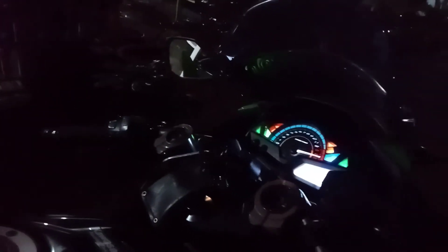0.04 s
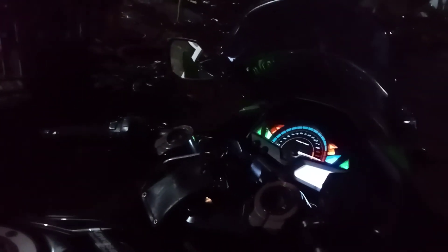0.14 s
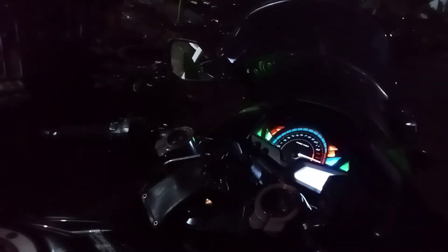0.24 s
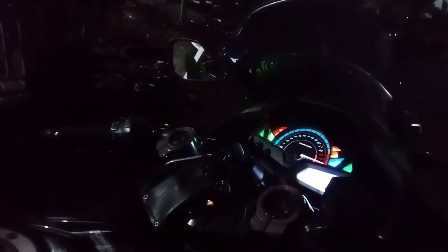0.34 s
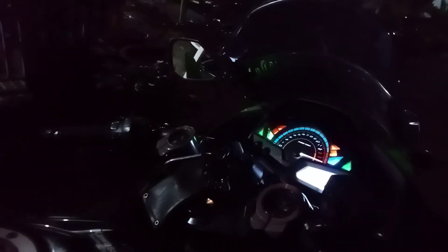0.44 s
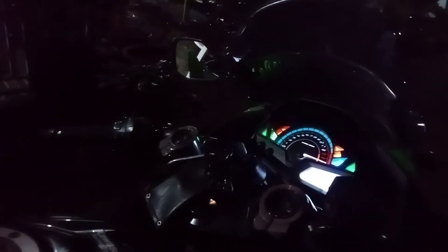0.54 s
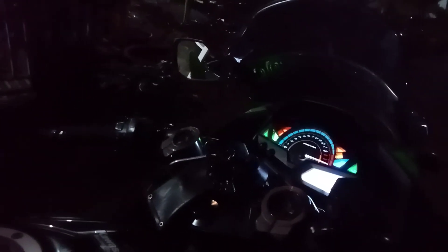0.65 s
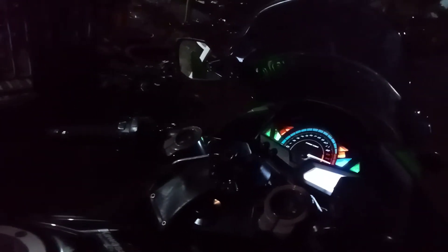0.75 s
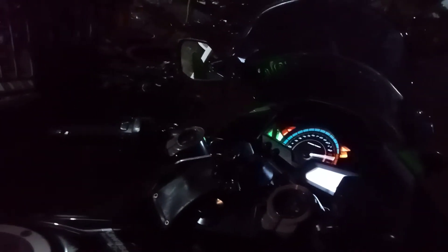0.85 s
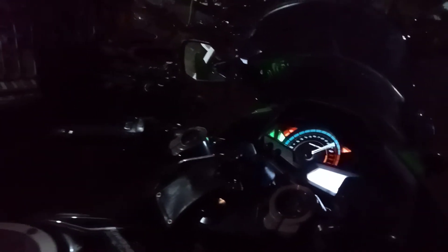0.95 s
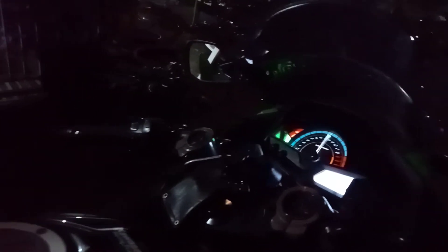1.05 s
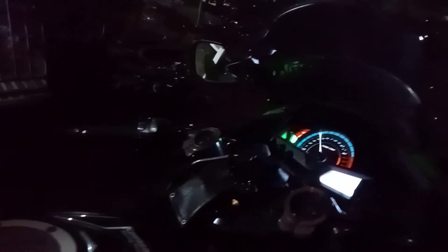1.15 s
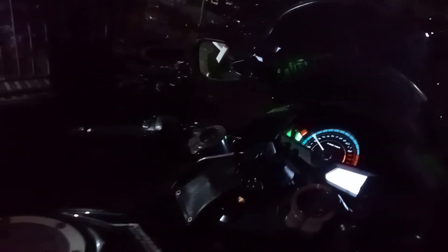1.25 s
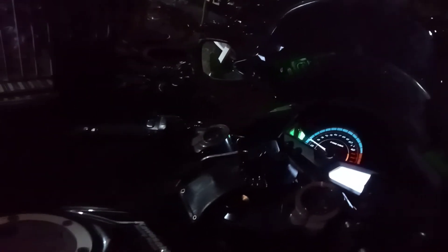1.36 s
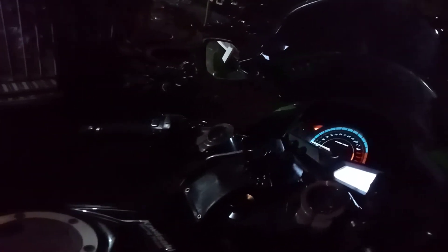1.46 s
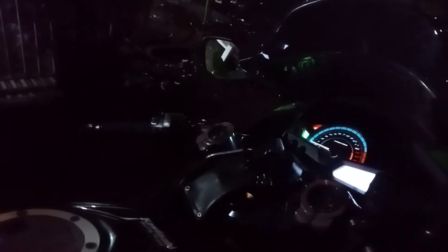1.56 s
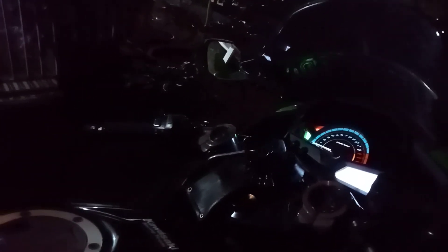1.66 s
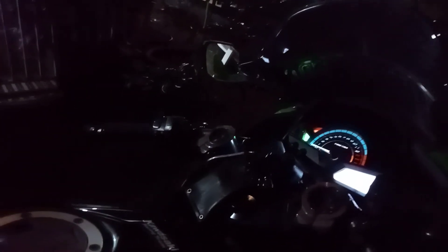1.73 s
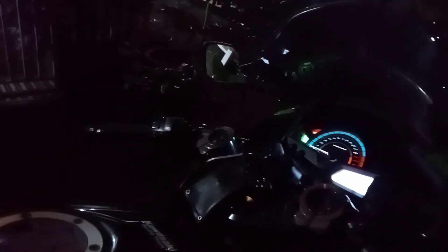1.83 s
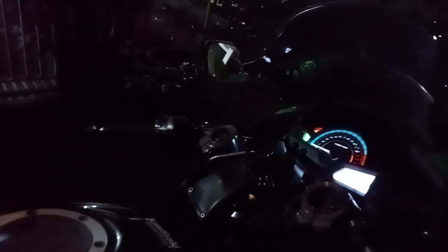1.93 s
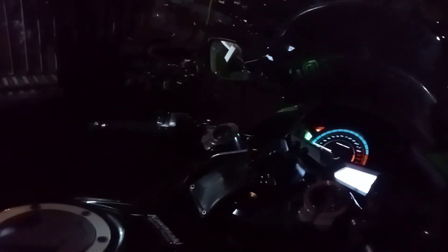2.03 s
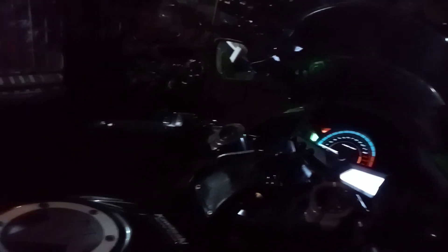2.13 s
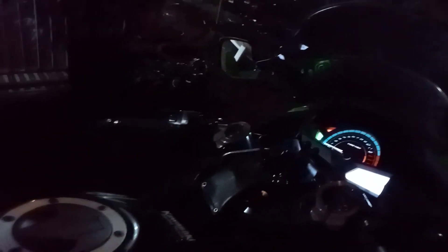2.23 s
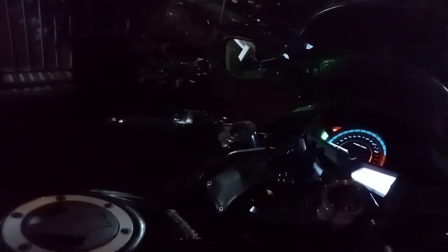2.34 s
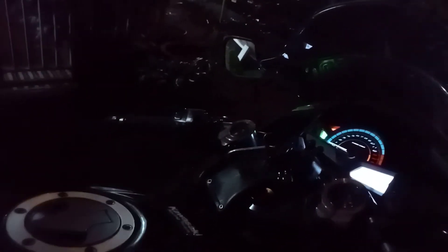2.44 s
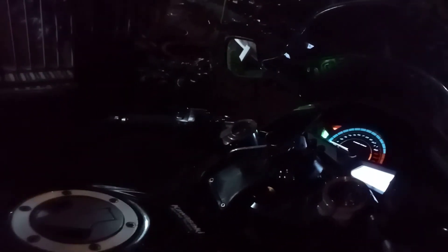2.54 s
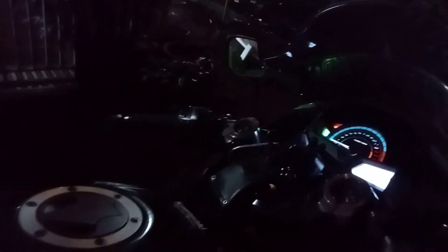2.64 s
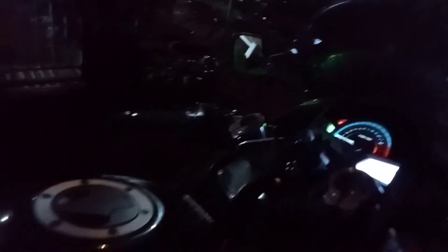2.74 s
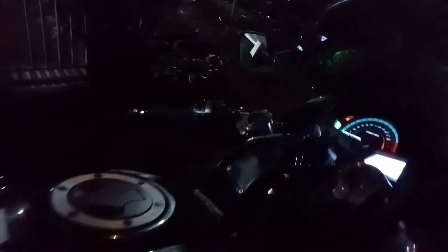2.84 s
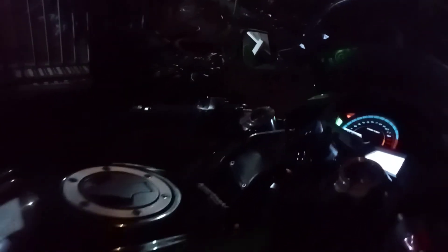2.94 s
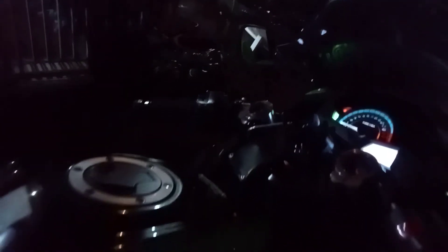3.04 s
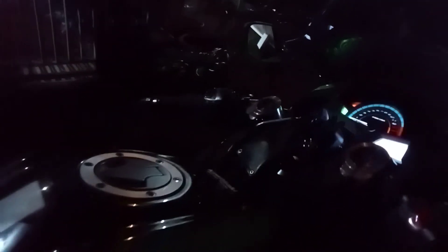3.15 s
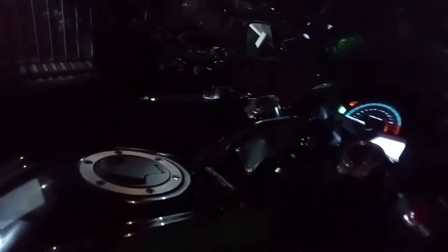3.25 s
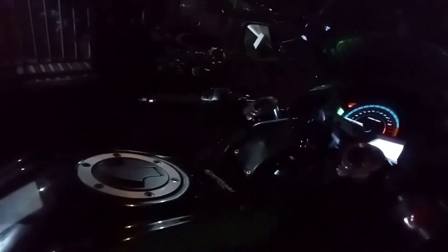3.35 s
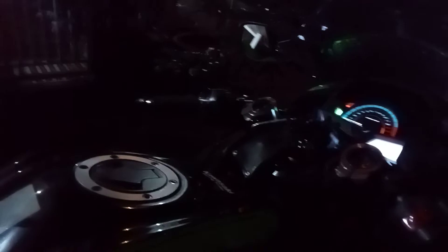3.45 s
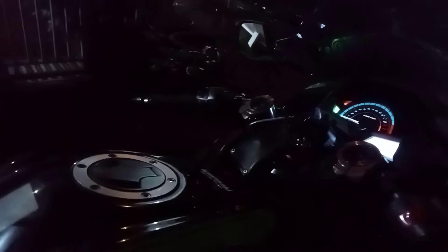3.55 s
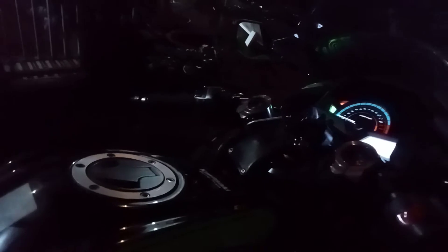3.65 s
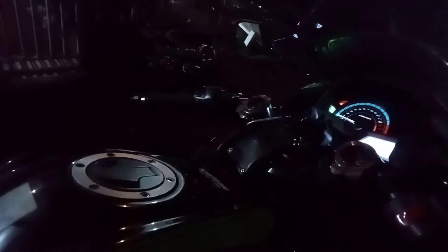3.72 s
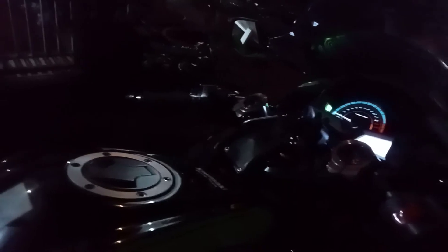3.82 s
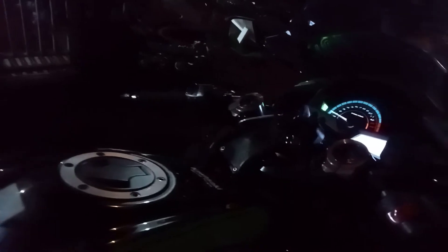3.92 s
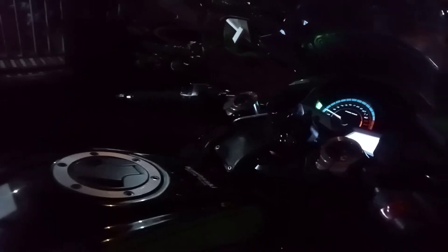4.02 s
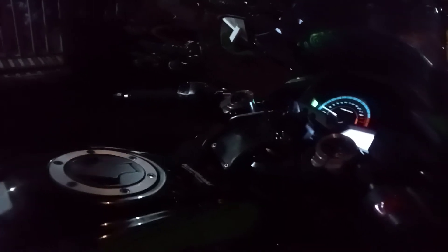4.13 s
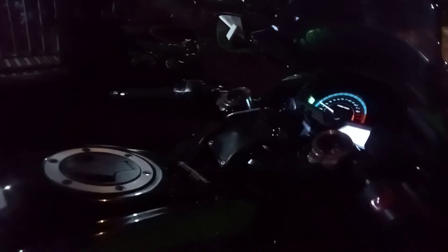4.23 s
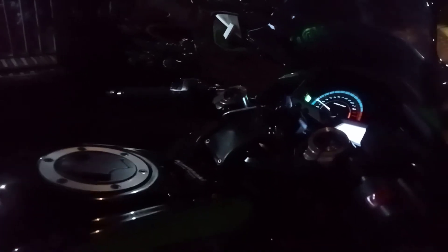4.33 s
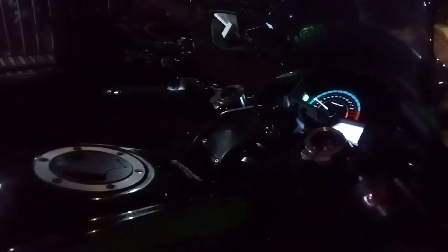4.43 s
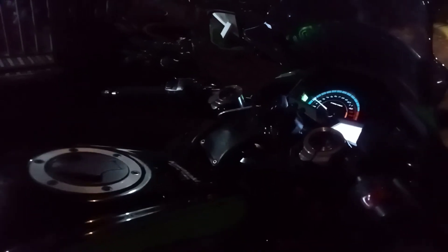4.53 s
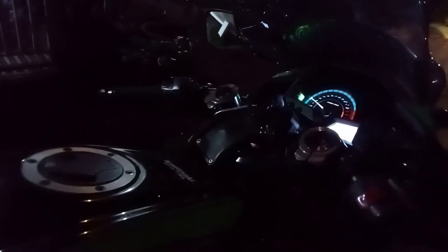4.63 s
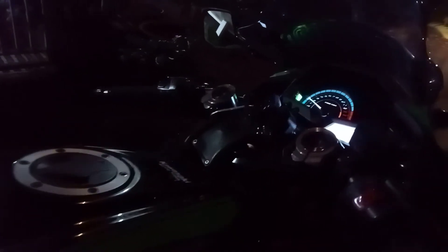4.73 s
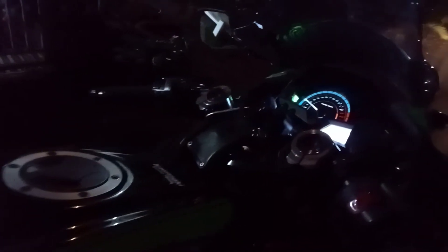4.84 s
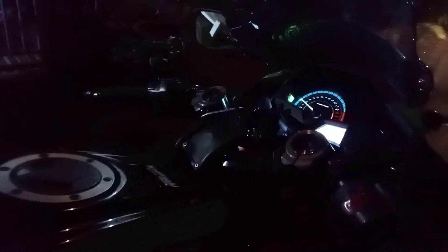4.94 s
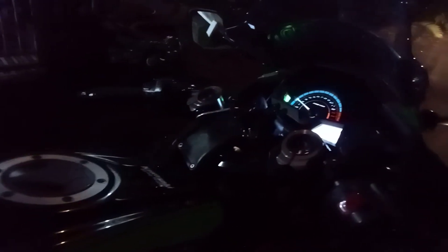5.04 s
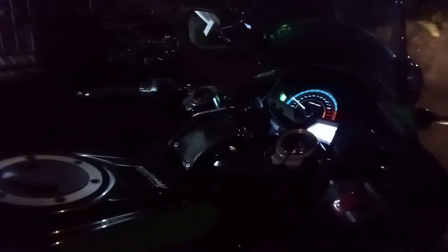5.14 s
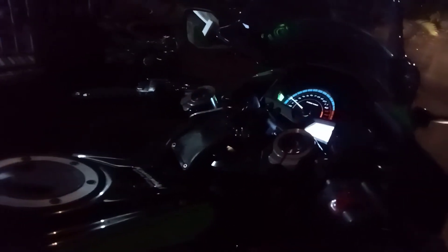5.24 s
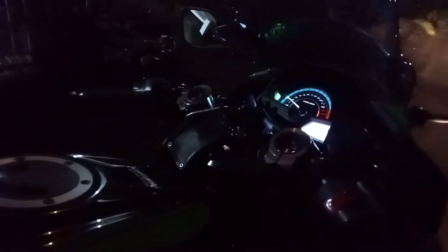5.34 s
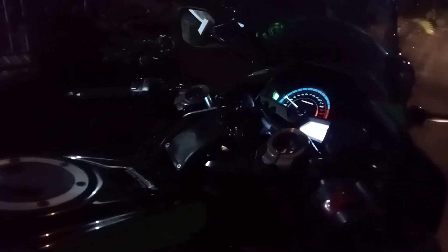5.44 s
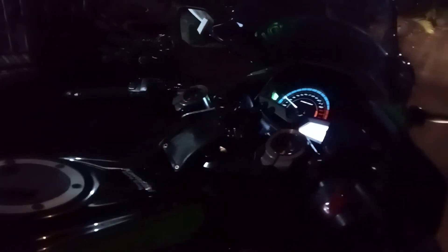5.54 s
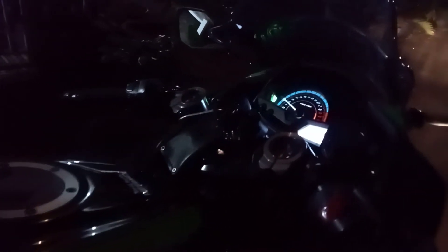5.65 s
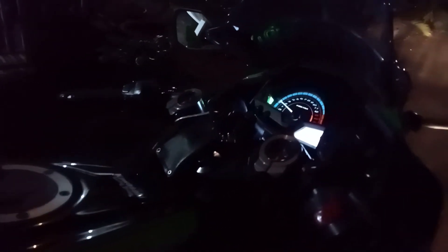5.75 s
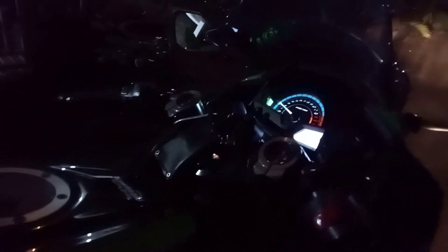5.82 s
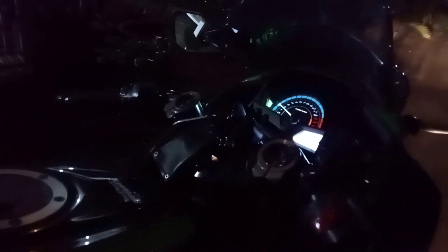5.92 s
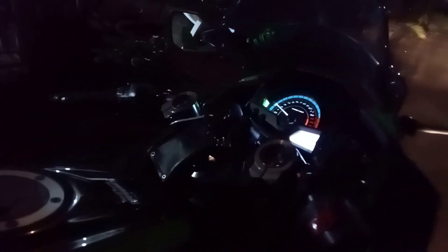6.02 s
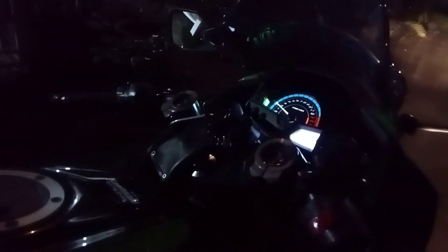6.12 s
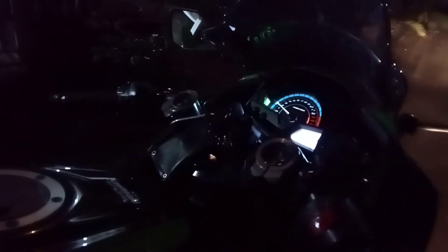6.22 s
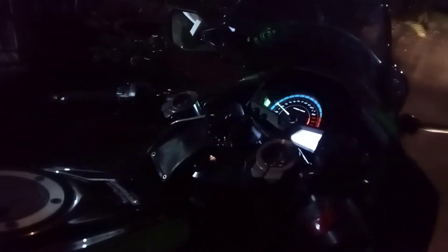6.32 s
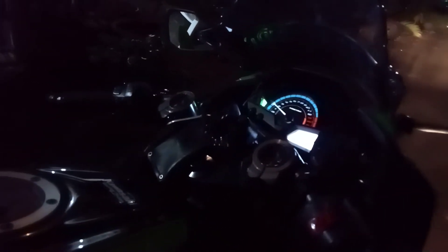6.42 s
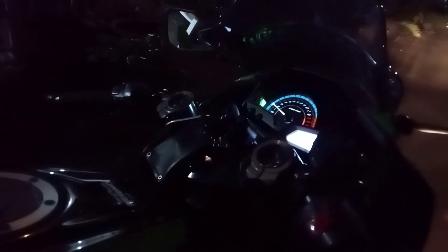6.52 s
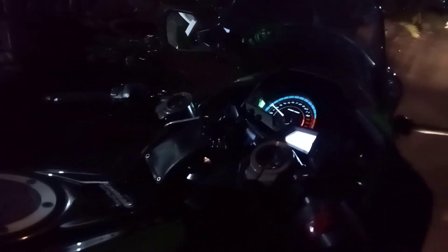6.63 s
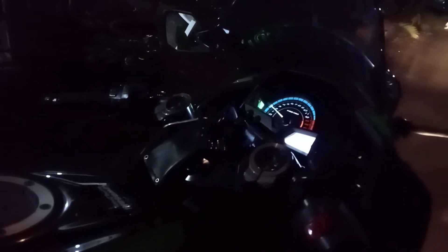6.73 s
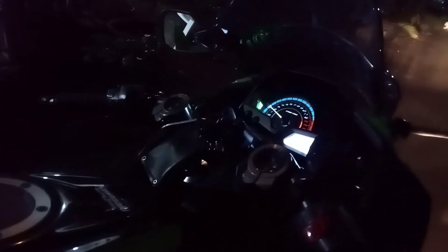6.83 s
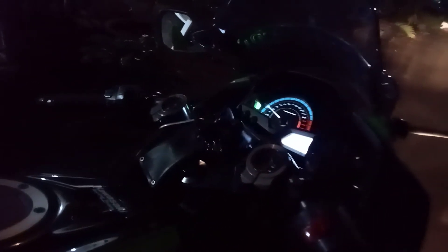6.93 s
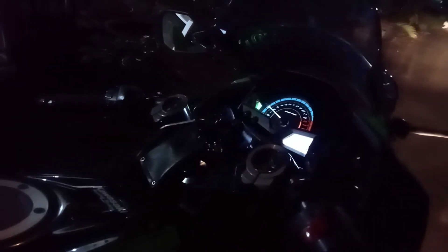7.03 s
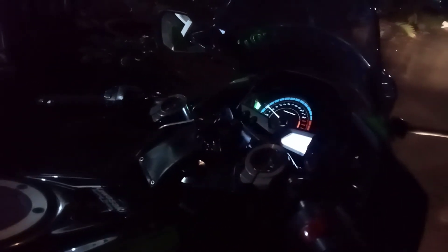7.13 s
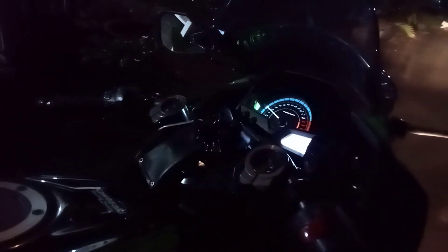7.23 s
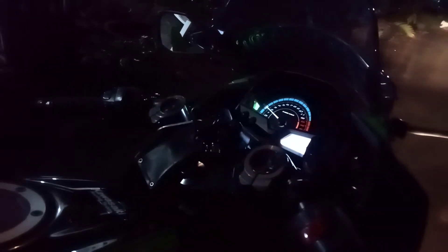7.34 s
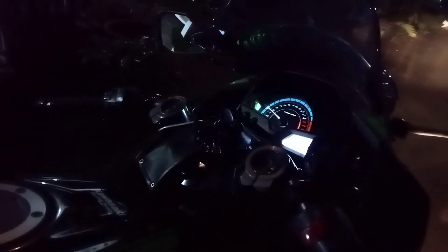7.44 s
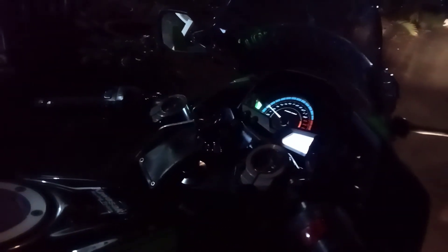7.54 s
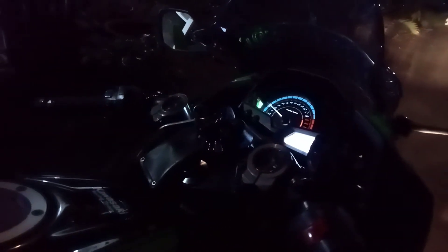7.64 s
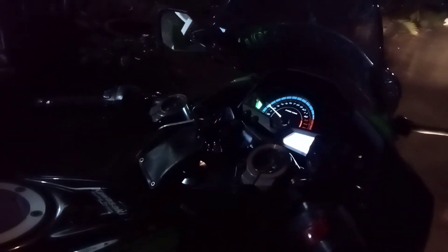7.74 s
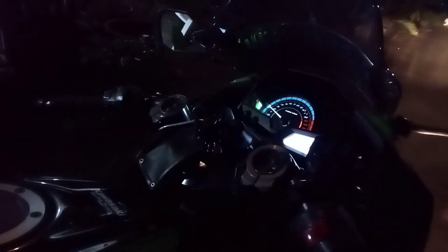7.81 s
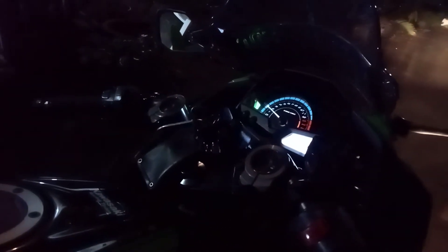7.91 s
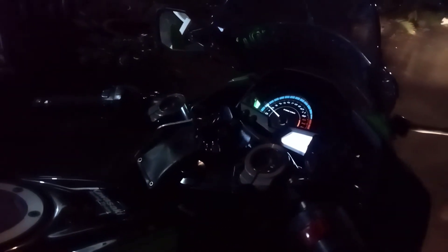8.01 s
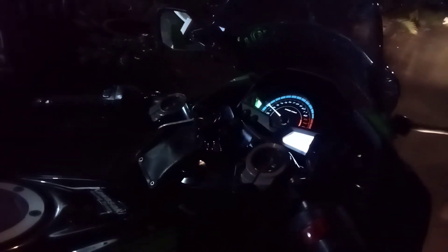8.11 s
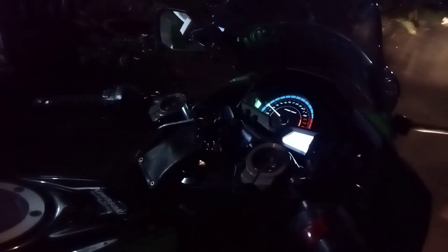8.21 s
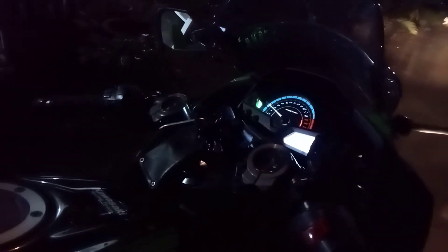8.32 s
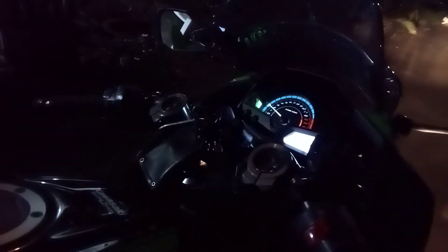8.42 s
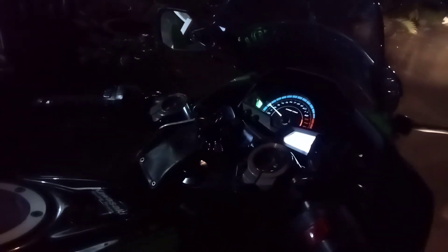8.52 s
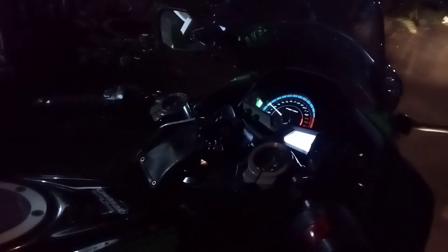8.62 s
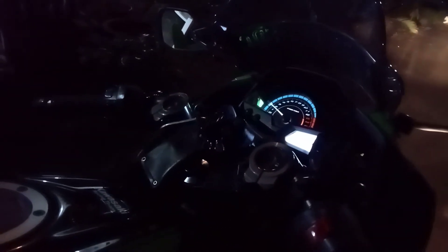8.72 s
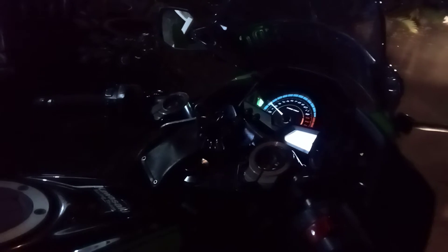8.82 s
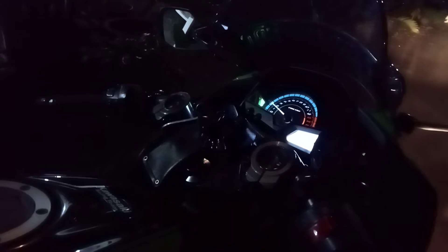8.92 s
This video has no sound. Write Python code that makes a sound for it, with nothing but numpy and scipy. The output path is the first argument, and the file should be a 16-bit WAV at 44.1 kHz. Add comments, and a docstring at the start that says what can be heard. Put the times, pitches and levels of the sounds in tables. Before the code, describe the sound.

Crickets and soft crunches, a sharp click with a short electric whir, then a grinding starter and a motorbike engine stumbling into a lumpy idle.

```python
"""Motorbike starting at night

Heard from the saddle: a switch clicks, a small pump whirs, the starter whines, the engine catches and idles.
Pairs of firing pulses strike damped exhaust modes; coloured noise, taps and pressure fronts make the clatter.
The starter and pump mix shaped hiss with tones; clicks are noise cracks over a knock in a plastic panel.
Crunches, cloth rustle, pulsed insect bands and wind are shaped noise around the twin-cylinder engine."""
import sys
import numpy as np
from scipy import signal
from scipy.fft import rfft, irfft, next_fast_len
from scipy.io import wavfile
from scipy.ndimage import uniform_filter1d

SR = 44100
rng = np.random.default_rng(int(sys.argv[2]) if len(sys.argv) > 2 else 0)


def dump_mix(stems):
    """Bounce the given channels to the path in sys.argv[1] as a 16-bit WAV at rate SR."""
    frames = np.atleast_2d(stems).T  # one column per channel
    limited = np.clip(frames, -1, 1)  # hard clip at full scale
    pcm = np.round(limited * 32767).astype(np.int16)
    wavfile.write(sys.argv[1], SR, pcm)


N = 395577
T = np.arange(N) / SR

# All levels are ahead of the final rounding; noise spectra are relative, since noise is scaled to rms 1.
# night air and wind spectra: freq_hz, density_db_per_hz
NIGHT_SPECTRUM = [(210, -26), (350, 0.5), (629, -7.5), (1130, -11.5), (1240, -12), (2420, -12), (2930, -6),
                  (4030, -22.5), (4790, -18.5), (5270, -31), (6180, -11.5), (7130, -6.5), (8220, -15),
                  (10600, -31), (15500, -36)]
WIND_SPECTRUM = [(15, -63), (25, -37), (49, -28), (73, -8.5), (118, -1), (188, -8), (242, -9.5), (436, -32),
                 (500, -30), (650, -64.5), (1100, -120)]
# wind on the microphone: time_s, level_db
WIND_LEVEL = [(0, -47.5), (.5, -47.5), (1.0, -50), (1.6, -45.5), (2.3, -49), (2.6, -47.5), (3.1, -41),
              (3.2, -44), (3.3, -36.5)]
# loudest dry crunches nearby: start_s, level_db
CRUNCHES = [(0.0294, -50), (0.9298, -57), (0.9901, -46.5), (1.0241, -50.5), (1.0755, -50), (1.1089, -50),
            (1.1244, -56), (1.1967, -49), (1.2346, -52), (1.2516, -47), (1.332, -48), (1.3994, -54),
            (1.436, -57)]
# hollow bands in the crunches: freq_hz, width_hz, relative_db
CRUNCH_BANDS = [(1670, 50, -3), (2120, 79, 2.5), (2500, 49, -3), (2940, 49, -7), (3300, 140, 0),
                (4100, 77, -8)]
# two passages of cloth rustle, each: time_s, level_db
RUSTLES = [
    [(0, -42), (.03, -52.5), (.06, -72), (.2, -80)],
    [(2.6, -78), (2.85, -64), (3.0, -61.5), (3.1, -55), (3.16, -59), (3.21, -63)],
]
# pump hiss: freq_hz, density_db_per_hz
PUMP_SPECTRUM = [(180, -28), (300, 0.5), (348, -7), (391, -7), (684, -11.5), (951, -17), (1870, -22),
                 (2200, -18), (2470, -23), (2870, -19), (5190, -30), (6980, -22), (15400, -36)]
# pump tones at full speed: pitch_hz, rms_db
PUMP_PARTIALS = [(285, -50), (388, -50.5), (1130, -65), (2261, -56), (2850, -62), (4520, -74), (5790, -75),
                 (6790, -69), (7095, -70), (7770, -72), (9050, -77), (11300, -77), (13566, -74),
                 (14115, -76), (14850, -74), (15300, -76)]
# switch and relay clicks: start_s, crack_db, treble_db, t60_s, panel_db
CLICK_EVENTS = [(1.5485, -26, -20, 0.029, -49), (1.5506, -3, -2, 0.013, -41), (1.563, -40, -55, .03, -32),
                (1.825, -37, -60, .09, -52), (1.837, -42, -60, .09, -51), (2.516, -41, -24, 0.026, -69),
                (3.2232, -8.5, -24.5, 0.1, -39), (3.711, -16.5, -29, 0.041, -46),
                (3.732, -11.5, -28, 0.069, -49)]
# click cracks: freq_hz, density_db_per_hz
CLICK_SPECTRUM = [(470, -68), (800, -7), (1640, -15), (3290, 3), (4160, -1), (4890, -26), (7010, -2),
                  (10600, -21.5), (12700, -20), (15500, -12)]
# plastic panel modes: pitch_hz, level_db, t60_s
PANEL_MODES = [(348, -3, 0.16), (806, -8, 0.2), (990, -0.5, 0.17), (2860, -8, .05)]
# starter gears: freq_hz, density_db_per_hz
STARTER_SPECTRUM = [(180, -32), (300, 1.5), (484, -12), (620, -7.5), (968, -12.5), (1240, -8), (1510, -7),
                    (2250, -2.5), (3630, -5), (4960, -29), (7140, -24.5), (9930, -40.5), (15500, -43)]
# ringing parts of the starter: freq_hz, width_hz, level_db
STARTER_RESONANCES = [(1240, 35, 4), (2280, 30, 6.5), (2530, 24, -1), (3180, 99, -34), (3370, 17, -11),
                      (7070, 72, 5.5), (7740, 50, 7), (8560, 95, -1), (9370, 39, -25)]
# starter armature speed: time_s, buzz_hz
ARMATURE_SPEED = [(3.235, 331.5), (3.30, 539), (3.35, 681.4), (3.40, 765), (3.46, 825), (3.495, 884),
                  (3.6, 866), (3.735, 945)]
# armature overtones: multiple of the buzz rate, level_db
ARMATURE_OVERTONES = [(2, -6.5), (2.5, -5), (3, -8), (3.5, -7), (4, 6.5), (4.5, -13), (5, -13), (6, 9),
                      (7, 8), (8, 14.5), (9, 15.5), (10, 18.5), (11, 15), (12, -1)]
# moments when the gears strain: start_s, length_s, grind_boost_db, treble_boost_db, whine_db
GEAR_STRAIN = [(3.219, .02, 1.5, 3, -50), (3.271, 0.049, 1, 7.5, -19), (3.335, .125, -0.5, 10, -18.5),
               (3.487, 0.059, 0.5, 11.5, -19.5), (3.727, 0.016, 6, 10.5, -19)]
# idle speed: time_s, crank_rpm
IDLE_SPEED = [(4.347, 1565.4), (4.53, 1483.7), (4.71, 1573.7), (5.37, 1550.8), (5.51, 1574.2),
              (5.73, 1501.9), (5.83, 1549.0), (6.45, 1545.1), (6.63, 1597.3), (6.81, 1540.1),
              (7.23, 1545.7), (7.41, 1582.1), (7.87, 1547.3), (7.97, 1581.9), (8.23, 1593.1),
              (8.33, 1565.5), (8.59, 1591.1), (8.97, 1538.7)]
# how hard the engine fires as it sags, stumbles and recovers: time_s, strength_db
FIRING_STRENGTH = [(4.3, 1), (4.75, -1), (5.1, -2), (5.68, -2), (5.75, -3.5), (5.82, 1.5), (6.3, -.5),
                   (8.97, -0.5)]
# first uneven firings and puffs: start_s, strength_db, gas warmth as pitch factor
FIRST_FIRINGS = [(3.384, -5, 0.68), (3.406, -7.5, 0.83), (3.492, -10, 0.68), (3.589, 7, 0.92),
                 (3.617, -16, .9), (3.642, -5, .84), (3.681, -8.5, 0.73), (3.713, -8.5, 0.76),
                 (3.787, -2, .97), (3.809, -6, 0.99), (3.829, 5.5, 0.8), (3.861, -6, 0.83),
                 (3.937, 4, 0.97), (3.966, -8, 0.75), (3.995, -12, .9), (4.041, -10, 0.91),
                 (4.071, 0.5, 0.97), (4.100, 2, 0.93), (4.175, -1.5, 0.98), (4.197, 2, 0.93),
                 (4.263, 3, 0.99), (4.283, 3, 1)]
# exhaust modes: pitch_hz, level_db, t60_s, polarity
PIPE_MODES = [(55.8, -29, 0.43, 1.0), (108, -23.5, 0.11, -1.0), (141.9, -3.5, 0.057, -1.0),
              (157.48, -26.5, 0.84, 1.0), (167.27, -11.5, 0.25, -1.0), (215.7, -22, 0.31, 1.0),
              (227.7, -27.5, 0.56, 1.0), (259, -11, 0.056, 1.0), (274.1, -33.5, 0.68, 1.0),
              (308.5, -16, 0.18, -1.0), (334.4, -18, 0.09, -1.0), (380.6, -22.5, 0.17, -1.0),
              (420.7, -30, 0.29, -1.0), (505.7, -34, 0.12, 1.0), (168.8, -1, 0.045, 1.0)]
# short upper pipe modes: pitch_hz, level_db, t60_s, polarity
UPPER_PIPE_MODES = [(600, -38, 0.12, -1), (748.6, -43.5, 0.17, 1), (952, -37, 0.042, -1)]
# valve gear and gas noise: freq_hz, density_db_per_hz
CLATTER_SPECTRUM = [(290, -40.5), (500, -2.5), (545, 1.5), (586, 0.5), (696, -13), (758, -6.5),
                    (815, -25.5), (954, -10), (1370, -18), (2610, -11.5), (3900, -16), (5130, -34.5),
                    (7130, -25.5), (9240, -38.5), (15500, -36)]
# valve taps in each cycle: share of cycle, strength_db
VALVE_TAPS = [(0.019, 12.5), (0.088, -4), (.3, -5), (.55, 5.5), (.8, 11), (.86, 1.5)]
# casing rung by the taps: pitch_hz, level_db, t60_s
CASING_MODES = [(1250, -13.5, 0.064), (1475, -9.5, 0.097), (1955, -22, 0.04), (2278, 4, 0.035),
                (2616, 4.5, 0.039), (2883, -6, .04), (3373, -8, 0.17), (3610, -4, 0.079), (3895, -7, 0.1),
                (5630, -22, 0.048), (7200, -8, 0.035)]
# steep pressure fronts at the pipe end: share of cycle, strength_db
PRESSURE_FRONTS = [(.035, 35), (.27, 42), (.43, 33)]

NIGHT_DB, CRICKET_DB, KATYDID_DB = -58, -59, -60.5
# evenly spaced chirps: first_s, period_s, length_s
CRICKET, KATYDID = (.055, .384, .19), (2.35, .215, .135)
# faint crunches scattered at random in these spans (from_s, to_s)
GRIT_SPANS, GRIT_PER_S, GRIT_DB = [(.06, .2), (1.0, 1.5)], 18, -61
# the pump hiss starts with a surge, then steadies
PUMP_ON_S, PUMP_OFF_S, PUMP_DB, PUMP_STOP_DB_PER_S = 1.56, 1.868, -47.5, 400
SURGE_DB, SURGE_S = 15.5, 0.039
STARTER_ON_S, STARTER_ATTACK_S = 3.221, 0.0082
# grinding and its treble: level while cranking, moment it lets go, fading after that
GRIND_DB, GRIND_HOLD_S, GRIND_FADE_DB_PER_S = -23, 3.59, 24
TREBLE_DB, TREBLE_HOLD_S, TREBLE_FADE_DB_PER_S = -32.5, 3.71, 31
STRAIN_RISE_S, STRAIN_FALL_S, WHINE_DB_PER_OCTAVE = 0.0092, 0.041, 15
COAST_S, COAST_LENGTH_S, COAST_HZ, COAST_SLOWING_S, COAST_DB = 3.8, .42, 5900, 1.01, -58
CRANK_START, SECOND_CYLINDER = .054, .243  # shares of the four-stroke cycle
IDLE_START_S, IDLE_START_RPM = IDLE_SPEED[0][:2]
# clatter: steady level, dB per dB of firing strength, extra just after the catch and its fading
CLATTER_DB, CLATTER_FOLLOWS, SETTLE_DB, SETTLE_S = -38.5, 1.26, 18, 0.11
CLATTER_ON_S, LEAK_DB = 4.0, -61.5
# the push of each early firing shortens as the engine gathers speed
FIRST_PUSH_MS, LAST_PUSH_MS = 6.25, 0.92
# the first idle firings are brighter, then the note settles
EARLY_TILT_DB_PER_OCTAVE, MELLOWING_S = 2, 1.14
TOP_HZ = 15550


def undb(db):
    """dB to gain."""
    return 10 ** (np.asarray(db) / 20)


def unit(x):
    """Scale to rms 1."""
    return x / np.sqrt(np.mean(x ** 2))


def curve(table, column=1):
    """A table column drawn as straight lines over time."""
    return np.interp(T, np.array(table)[:, 0], np.array(table)[:, column])


def gain(table, column=1):
    """A dB column as gain, silent outside the table."""
    return undb(curve(table, column)) * (T >= table[0][0]) * (T <= table[-1][0])


def span(start, length, rise, fall):
    """Rise to one from the start, hold until the length is over, then fall away."""
    return np.clip(np.minimum((T - start) / rise, 1 + (start + length - T) / fall), 0, 1)


def walk(rate):
    """Random wander, spread 1, with about this many new values a second."""
    hold = int(SR / rate)
    steps = np.repeat(rng.standard_normal(N // hold + 1), hold)
    return unit(uniform_filter1d(steps, hold)[:N])


def colour(hz, spectrum, rings=()):
    """Gain of a spectrum with resonances on top."""
    points = np.array(spectrum)
    shape = undb(np.interp(np.log(hz), np.log(points[:, 0]), points[:, 1]))
    return shape * (1 + sum(undb(db) / (1 + ((hz - f) / w) ** 2) for f, w, db in rings))


def noise(spectrum, rings=()):
    """Noise coloured in the frequency domain, rms 1."""
    size = next_fast_len(N)
    hz = np.arange(size // 2 + 1) * SR / size + 1
    shaped = rfft(rng.standard_normal(size)) * colour(hz, spectrum, rings)
    return unit(irfft(shaped)[:N])


def band(x, lo_hz, hi_hz):
    """Steep band-pass."""
    edges = [lo_hz, min(hi_hz, SR / 2.2)]
    return signal.sosfilt(signal.butter(3, edges, "band", fs=SR, output="sos"), x)


def ring(modes, seconds, pitch=1.):
    """Decaying sines of damped modes after one blow."""
    t = np.arange(int(seconds * SR)) / SR
    out = np.zeros(len(t))
    for mode in modes:
        hz, db, t60 = mode[:3]
        decay = np.exp(-np.log(1000) * t / t60)
        # a last column below zero flips the polarity
        out += np.sign(mode[-1]) * undb(db) * decay * np.sin(2 * np.pi * pitch * hz * t)
    return out


def add(out, s, x):
    """Mix x in at time s."""
    i = int(s * SR)
    out[i:i + len(x)] += x[:N - i]


def insect(hz, width_hz, strokes, depth):
    """Narrow scraping that pulses with the wing strokes, rms 1."""
    turns = np.cumsum(strokes * (1 + 0.12 * walk(6.2))) / SR
    chop = 1 - np.clip(depth, 0, 1) * np.cos(np.pi * turns) ** 2
    return unit(band(rng.standard_normal(N), hz - width_hz / 2, hz + width_hz / 2) * chop)


def chirps(song, db, count):
    """Swell and fade of evenly spaced chirps, each a little different in level."""
    first, period, length = song
    out = np.zeros(N)
    for k, chance in enumerate(rng.standard_normal(count)):
        progress = np.clip((T - first - k * period) / length, 0, 1)
        out += undb(db + 0.79 * chance) * np.sqrt(np.sin(np.pi * progress) + 1e-12)
    return out


def night():
    """Hiss of far insects, two nearer chirpers, a throbbing insect heard in two bands, wind on the microphone."""
    air = undb(NIGHT_DB + 0.55 * walk(5.68)) * noise(NIGHT_SPECTRUM)
    cricket = insect(2886.0, 160.0, 65., 0.36) * chirps(CRICKET, CRICKET_DB, count=9)
    katydid = insect(4450.0, 540.0, 150., 0.37) * chirps(KATYDID, KATYDID_DB, count=3)
    throb = np.clip(np.sin(2 * np.pi * (4.05 * T - .07)) + 0.37, 0, 1)
    high_band = undb(-63) * insect(7840.0, 700., 180., .5)
    low_band = undb(-72.5) * insect(4800.0, 260., 180., .5)
    wind = noise(WIND_SPECTRUM) * undb(curve(WIND_LEVEL) + 2.0 * walk(20))
    return air + cricket + katydid + throb * (high_band + low_band) + wind


def handling():
    """Short noise crunches that ring in a few hollow bands, and band-passed cloth rustle."""
    out, t = np.zeros(N), T[:SR // 16]
    spectrum = [(900, -34), (1400, -8), (4200, -14.5), (4900, -45)]  # (Hz, dB per Hz)
    rings = [(hz, width, db + 13) for hz, width, db in CRUNCH_BANDS]
    grit = noise(spectrum, rings) * undb(1.9 * walk(300))
    faint = []
    for start, end in GRIT_SPANS:
        for place, strength in rng.random((round(GRIT_PER_S * (end - start)), 2)):
            faint.append((start + (end - start) * place, GRIT_DB + 8.0 * (strength - .5)))
    envelope = np.exp(-t / 0.024) * np.minimum(t / 0.0016, 1)
    for s, db in CRUNCHES + faint:
        add(out, s, undb(db) * grit[int(s * SR):][:len(t)] * envelope)
    cloth = unit(band(rng.standard_normal(N), 1000, 4000)) * undb(1.5 * walk(60))
    return out + cloth * sum(gain(part) for part in RUSTLES)


def pump():
    """Brief electric whir: hiss that surges at the start, and thin tones that rise to speed."""
    on = np.interp(T, [1.57, 1.65, 1.83, 1.86], [0, 1, 1, 0])
    speed = np.interp(T, [1.56, 1.62, 1.68], [.9, .93, 1]) + .0015 * walk(59)
    turn = np.cumsum(speed) / SR
    tones = sum(undb(db + 2.0 * walk(22.34)) * np.sin(2 * np.pi * hz * turn) for hz, db in PUMP_PARTIALS)
    since = np.maximum(T - PUMP_ON_S, 0)
    hiss_db = PUMP_DB + SURGE_DB * np.exp(-since / SURGE_S)
    hiss_db = hiss_db - PUMP_STOP_DB_PER_S * np.maximum(T - PUMP_OFF_S, 0)
    hiss = np.clip(since / .004, 0, 1) * undb(hiss_db) * noise(PUMP_SPECTRUM)
    return hiss + np.sqrt(2) * on * tones  # the root turns sine rms into peak


def switches():
    """Sharp decaying noise cracks, each with a knock in the plastic panel."""
    out, t = np.zeros(N), T[:SR // 4]
    crack = noise(CLICK_SPECTRUM)
    low, high = unit(band(crack, 700, 4900)), unit(band(crack, 4900, 19000))
    for s, db, treble_db, t60, panel_db in CLICK_EVENTS:
        i = slice(int(s * SR), int(s * SR) + len(t))
        mix = (undb(db) * low[i] + undb(treble_db) * high[i]) / 2
        add(out, s, mix * np.exp(-np.log(1000) * t / t60))
        add(out, s, undb(panel_db) * ring(PANEL_MODES, .25))
    return out


def grinding(strain):
    """Gear noise in a ringing casing, its level shifted where the gears strain."""
    raw = noise(STARTER_SPECTRUM, STARTER_RESONANCES) * undb(0.97 * walk(250))
    low, high = unit(band(raw, 250, 6600)), unit(band(raw, 4900, 21000))
    boosts = np.array(GEAR_STRAIN)
    low_db = GRIND_DB - GRIND_FADE_DB_PER_S * np.maximum(T - GRIND_HOLD_S, 0) + boosts[:, 2] @ strain
    high_db = TREBLE_DB - TREBLE_FADE_DB_PER_S * np.maximum(T - TREBLE_HOLD_S, 0) + boosts[:, 3] @ strain
    on = np.clip((T - STARTER_ON_S) / STARTER_ATTACK_S, 0, 1) * np.clip((4.3 - T) / 0.27, 0, 1)
    return on * (low * undb(low_db) + high * undb(high_db))


def armature(strain):
    """Overtones of the armature's buzz that light up as they cross the casing's resonances."""
    hz = curve(ARMATURE_SPEED) * (1 + 0.0061 * walk(150))
    turn = 2 * np.pi * np.cumsum(hz) / SR
    whine = np.zeros(N)
    for k, db in ARMATURE_OVERTONES:
        casing = colour(k * hz, STARTER_SPECTRUM, STARTER_RESONANCES)
        whine += undb(db + 2.5 * walk(50)) * casing * np.sin(k * turn)
    strained = undb(np.array(GEAR_STRAIN)[:, 4]) @ strain ** 3
    return whine * strained * undb(WHINE_DB_PER_OCTAVE * np.log2(hz / ARMATURE_SPEED[-1][1]))


def coasting():
    """Thin unsteady tone that sinks as the starter slows."""
    slowing = np.exp(-np.maximum(T - COAST_S, 0) / COAST_SLOWING_S)
    hz = COAST_HZ * slowing + 35 * walk(150)
    tone = np.sin(2 * np.pi * np.cumsum(hz) / SR) * undb(COAST_DB + 3.5 * walk(45))
    return tone * span(COAST_S, COAST_LENGTH_S, 0.031, 0.048)


def starter():
    """Grinding gears, whining armature and its coasting tone."""
    strain = np.array([span(row[0], row[1], STRAIN_RISE_S, STRAIN_FALL_S) for row in GEAR_STRAIN])
    return grinding(strain) + armature(strain) + coasting()


def crank():
    """Four-stroke cycles of two turns each, counted from the start of the idle."""
    turned = np.cumsum(curve(IDLE_SPEED) * (T >= IDLE_START_S)) / 120 / SR
    before = (T < IDLE_START_S) * (IDLE_START_S - T) * IDLE_START_RPM / 120
    return CRANK_START + turned - before


def valve_taps(cycles):
    """Taps near fixed crank angles that ring the casing."""
    hits = np.zeros(N)
    for share, db in VALVE_TAPS:
        chance = rng.standard_normal((100, 2)).T
        when = np.interp(np.arange(-10, 90) + share + .012 * chance[0], cycles, T)
        hits[(when * SR).astype(int).clip(0, N - 1)] = undb(db + 3.1 * chance[1])
    # each tap is a short scrape, so it colours the ringing afresh
    scrape = signal.fftconvolve(hits, np.exp(-np.arange(400) / 104.0))[:N] * rng.standard_normal(N)
    return undb(-32) * signal.fftconvolve(scrape, ring(CASING_MODES, .1))[:N]


def pressure_fronts(cycles):
    """Band-passed impulses at fixed crank angles, uneven in strength."""
    fronts = np.zeros(N)
    for share, db in PRESSURE_FRONTS:
        when = np.interp(np.arange(90) + share, cycles, T)
        fronts[(when * SR).astype(int)] = undb(db + 2.0 * rng.standard_normal(90))
    return band(fronts, 574, 1123)


def clatter_level():
    """Gain that follows the firing strength and is louder until the idle settles."""
    since = np.maximum(T - CLATTER_ON_S, 0)
    level_db = CLATTER_DB + CLATTER_FOLLOWS * curve(FIRING_STRENGTH) + SETTLE_DB * np.exp(-since / SETTLE_S)
    return undb(level_db) * np.clip(since / 0.27, 0, 1)


def clatter(cycles):
    """Grainy whir of gears and gas that breathes with the cycle, valve taps, pressure fronts and a leak."""
    whir = noise(CLATTER_SPECTRUM)
    breath = np.cos(2 * np.pi * (cycles % 1 - .22))
    gears = band(whir, 587, 5300) * undb(1.87 * breath + 1.09 * walk(25) + 1.5)
    gas = band(whir, 5050, 19000) * undb(1.1 * breath + 1.1 * walk(17) + 2.0)
    out = gears + gas
    # narrow bands of the whir flicker independently, making it grainy
    for hz, _, _ in CASING_MODES:
        out = out + undb(-13.0 + 7.5 * walk(45)) * band(whir, hz - 90, hz + 90)
    out = out + valve_taps(cycles) + pressure_fronts(cycles)
    # a thin leak hisses while the two cylinders blow down
    leak = undb(LEAK_DB + 6.2 * breath) * unit(band(rng.standard_normal(N), 8000, 17500))
    return out * clatter_level() + leak * np.clip((T - CLATTER_ON_S) / 2.1, 0, 1)


def catching():
    """Uneven first firings: smooth gas pushes that ring the pipe, each at its own warmth."""
    out = np.zeros(N)
    ends_s = [FIRST_FIRINGS[0][0], FIRST_FIRINGS[-1][0]]
    for s, db, warmth in FIRST_FIRINGS:
        push_ms = np.interp(s, ends_s, [FIRST_PUSH_MS, LAST_PUSH_MS])
        push = np.hanning(int(push_ms * SR / 1000) + 3)
        note = signal.fftconvolve(ring(PIPE_MODES, .5, warmth), push / push.sum())
        add(out, s - push_ms / 2000, undb(db) * note)  # centres the push on s
    return out


def idling(cycles):
    """Two firings about half a turn apart, then a long gap, each ringing the pipe."""
    count = int(cycles[-1]) + 1
    firings = (np.arange(count)[:, None] + [0, SECOND_CYLINDER]).ravel()
    when = np.interp(firings, cycles, T)
    chance = rng.standard_normal((2 * count, 2)).T
    at = np.clip(((when + .0001 * chance[0]) * SR).astype(int), 0, N - 1)
    pulses = np.zeros(N)
    pulses[at] = undb(curve(FIRING_STRENGTH)[at] + 0.6 * chance[1])
    # no two charges leave alike: a little turbulence follows each
    tail = signal.fftconvolve(pulses, np.exp(-np.arange(2000) / 1040.0))[:N]
    blow = pulses + undb(-42) * tail * rng.standard_normal(N)
    early = np.exp(-np.maximum(T - IDLE_START_S, 0) / MELLOWING_S)
    bright = [(hz, db + EARLY_TILT_DB_PER_OCTAVE * np.log2(hz / 230), t60, sign)
              for hz, db, t60, sign in PIPE_MODES]
    out = np.zeros(N)
    for share, modes in ((early, bright), (1 - early, PIPE_MODES)):
        out += signal.fftconvolve(share * blow, ring(modes + UPPER_PIPE_MODES, 0.51))[:N]
    return out


def exhaust(cycles):
    """The pipe rung by the first firings and by the idle."""
    return idling(cycles) + catching()


def scene():
    """Everything at one microphone."""
    cycles = crank()
    surroundings = night() + handling()
    electrics = pump() + switches() + starter()
    return (surroundings + electrics + clatter(cycles) + exhaust(cycles))[None]


def record(dry):
    """Gentle rounding of peaks and a steep top cut."""
    rounded = np.tanh(0.78 * dry) / 0.72
    return signal.sosfilt(signal.ellip(14, .2, 80, TOP_HZ, fs=SR, output="sos"), rounded)


dry = scene()
out = record(dry)
dump_mix(out)
```